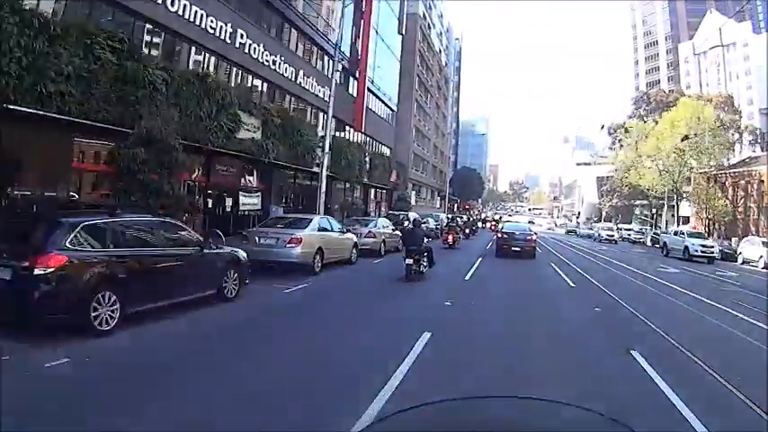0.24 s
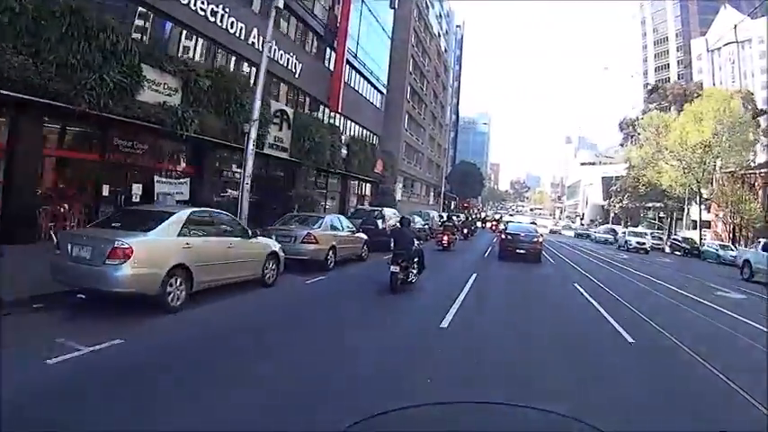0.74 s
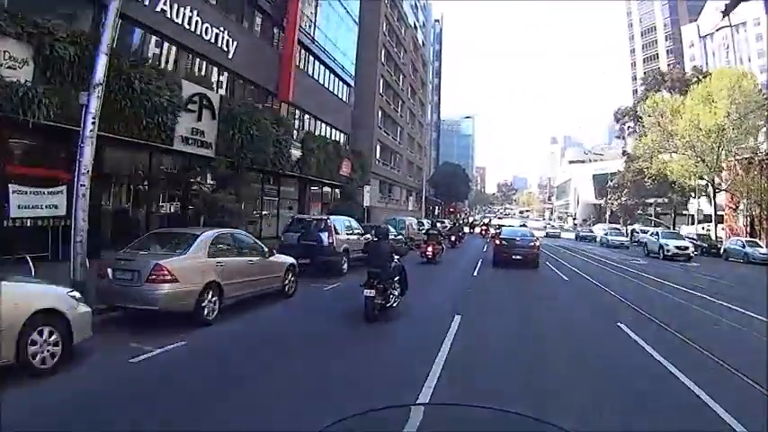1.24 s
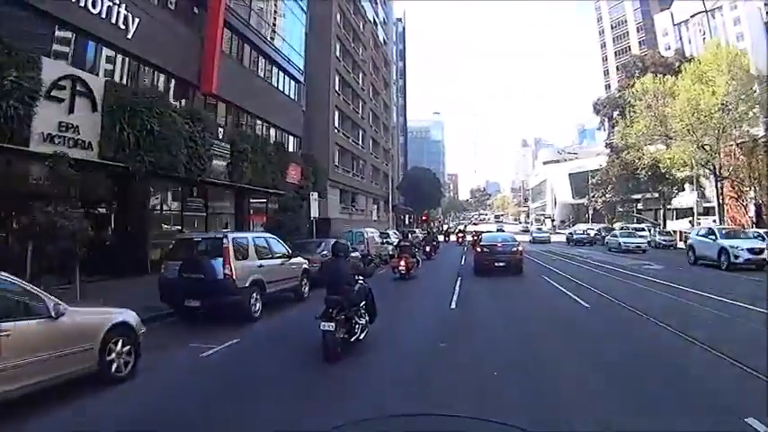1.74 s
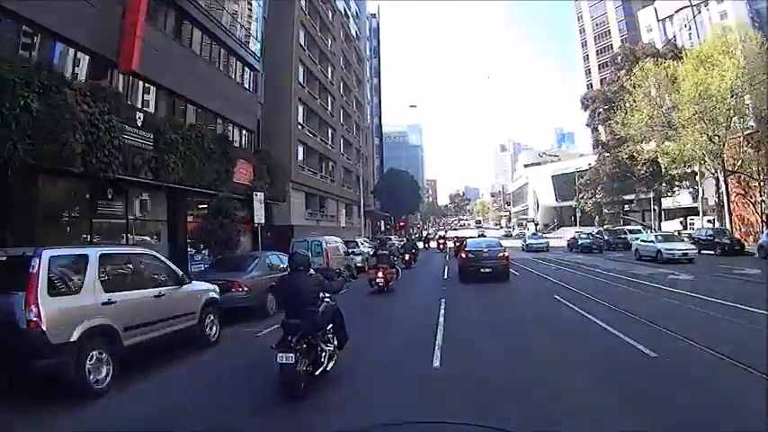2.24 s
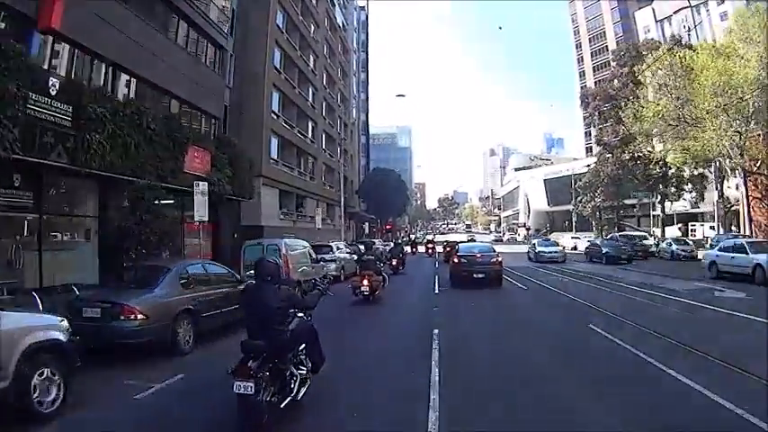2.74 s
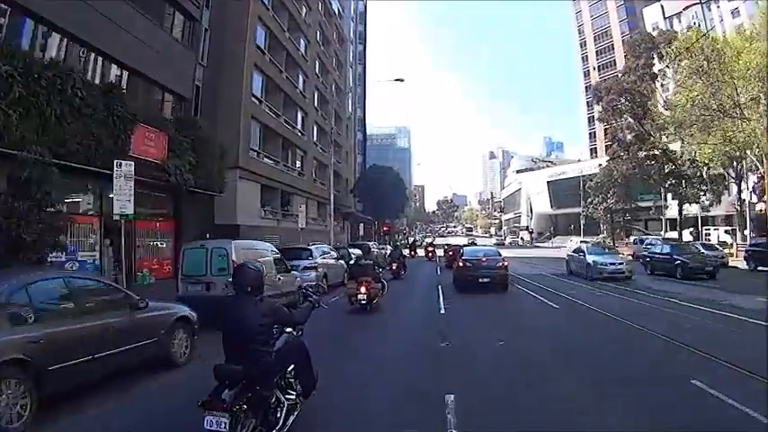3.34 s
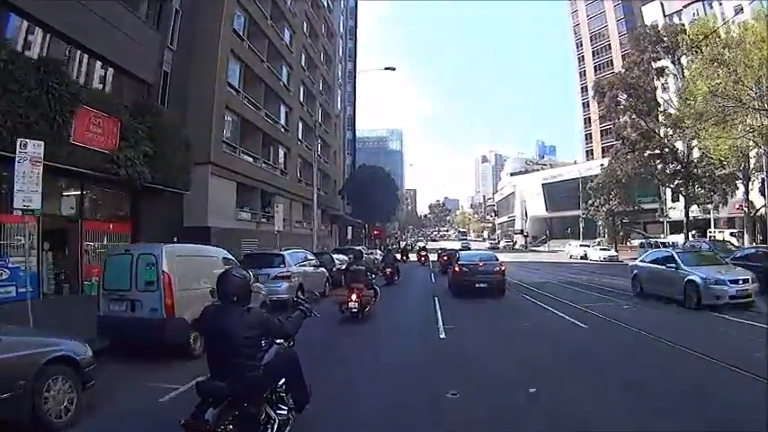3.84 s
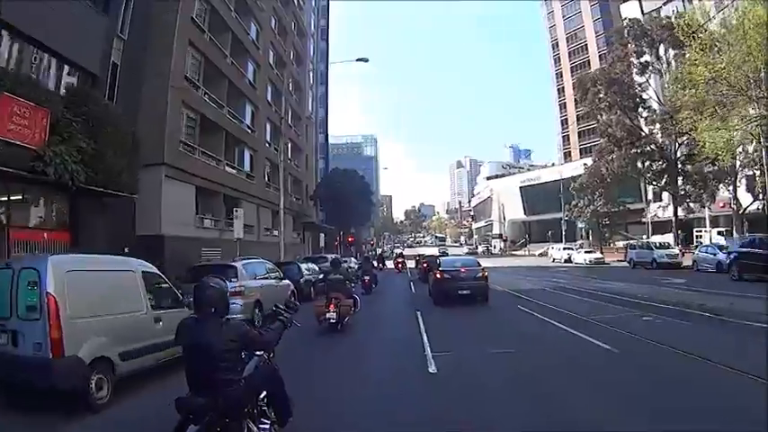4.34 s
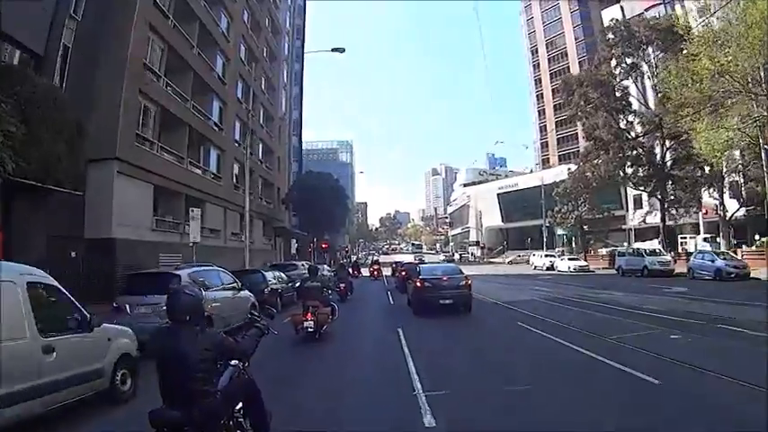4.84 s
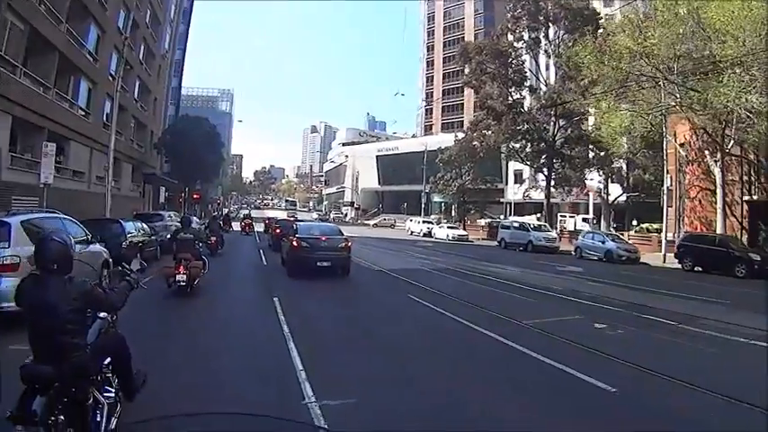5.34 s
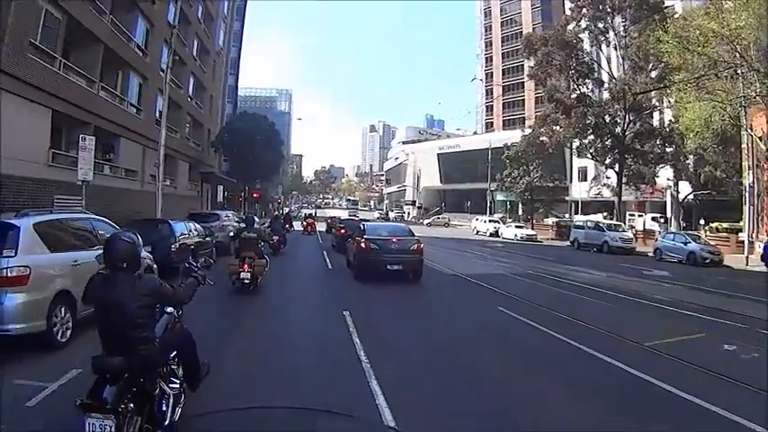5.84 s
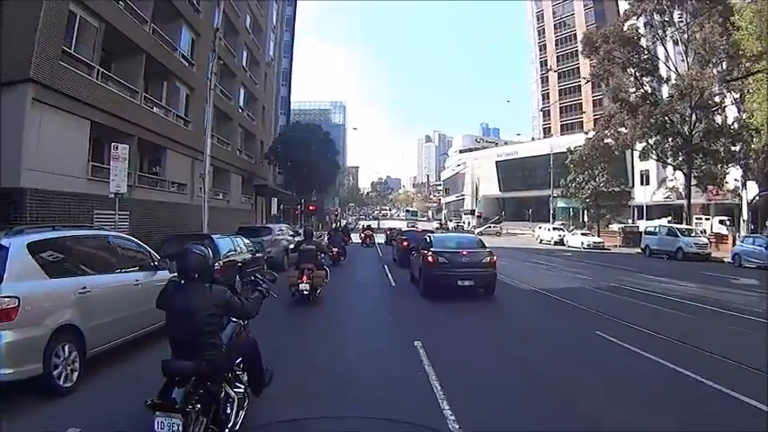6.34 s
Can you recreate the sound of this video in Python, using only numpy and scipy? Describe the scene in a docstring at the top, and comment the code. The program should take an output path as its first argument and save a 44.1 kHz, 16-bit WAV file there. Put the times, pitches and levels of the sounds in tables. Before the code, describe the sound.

Heard from on a motorcycle slowing in a city street between tall buildings. A loud, harsh brake rasp with bright hiss starts at once and fades over two seconds. Then metallic ticks repeat about three times a second, with short thin high squeals between them. Underneath, the bike's own engine throbs low in uneven surges, other cruisers rumble ahead to the left with echo, and tyre noise thins out.

```python
"""A city street between buildings: a motorcycle slows behind other cruisers, heard from a two-port housing on the bike.
Filtered noise makes the traffic; V-twin pulses and puffs, echoed by the fronts, make the throbbing engines.
Decaying low sines thud through the frame where the road has seams.
Close by, the brake pads rasp, hiss and crackle as clumpy noise rings the housing; as their pressure eases,
struck modes and noise snaps tick, mostly a wheel turn apart, and a gated disc tone squeals in short spells."""
import sys
import numpy as np
from scipy import signal
from scipy.fft import rfft, irfft, next_fast_len
from scipy.io import wavfile
from scipy.ndimage import map_coordinates

SR = 44100
rng = np.random.default_rng(int(sys.argv[2]) if len(sys.argv) > 2 else 0)


def to_wav(sig):
    """Store sig (one row per channel, or 1-D mono) as 16-bit WAV at the path in sys.argv[1].

    Samples outside -1..1 are clipped; the rate is SR.
    """
    pcm = np.clip(np.atleast_2d(sig), -1, 1) * 32767
    pcm = np.round(pcm).astype(np.int16)
    wavfile.write(sys.argv[1], SR, pcm.T)  # frames by channels


N = 290178


def clock():
    """The time of each sample in seconds."""
    return np.arange(N) / SR


def amp(db):
    """Decibels to gain."""
    return 10 ** (np.asarray(db) / 20)


def unit(x):
    """Scaled to rms 1."""
    return x / np.sqrt(np.mean(x ** 2) + 1e-20)


def along(points, hz):
    """(Hz, value) points read on a log frequency axis."""
    point_hz, values = np.transpose(points)
    return np.interp(np.log(hz + 1), np.log(point_hz), values)


def curve(rows):
    """(time_s, value) rows drawn out to one value per sample."""
    time_s, values = np.transpose(rows)
    return np.interp(clock(), time_s, values)


def wobble(rate):
    """A smooth random curve, rate knots a second."""
    knots = rng.standard_normal(N // 8)
    return map_coordinates(knots, [clock() * rate], mode="wrap")


def filtered(x, response):
    """x times a complex response of frequency."""
    size = 2 * next_fast_len(N // 2 + SR // 4)
    hz = np.fft.rfftfreq(size, 1 / SR)
    return irfft(rfft(x, size) * response(hz), size)[..., :N]


def ring(x, spectrum):
    """x through a causal, minimum-phase body with this spectrum."""
    def response(hz):
        cepstrum = irfft(np.log(amp(along(spectrum, hz))))
        half = len(cepstrum) // 2
        # folding the cepstrum forward in time makes the body causal
        return np.exp(rfft(2 * cepstrum[:half], 2 * half) - cepstrum[0])
    return filtered(x, response)


def spread(pair, alike):
    """Two unrelated signals become left and right with a given likeness at each frequency."""
    def mid_side_gains(hz):
        turn = np.arccos(np.clip(along(alike, hz), -1, 1)) / 2
        return np.array([np.cos(turn), np.sin(turn)])
    mid, side = filtered(pair, mid_side_gains)
    return np.array([mid + side, mid - side])


# Likeness of left and right for the diffuse street sound: freq_hz, likeness (-1 to 1)
STREET_LIKENESS = [(60, 0.36), (250, 0.87), (340, -0.21), (480, -0.6), (620, -0.16), (770, -0.59),
                   (900, 0.097), (1050, 0.1), (1400, -0.42)]


def street(x, t60, wet_db):
    """Direct sound plus the diffuse answer of the building fronts, a decaying noise tail (t60 in s)."""
    t = np.arange(SR // 2) / SR
    tail = rng.standard_normal((2, len(t))) * amp(-60 * t / t60)
    echo = signal.fftconvolve(x[None], tail, axes=1)[:, :N]
    diffuse = unit(spread(echo, STREET_LIKENESS))
    return unit(unit(x) + amp(wet_db) * diffuse)


def v_twin(crank_hz, pipe, rough, blow):
    """Two unevenly spaced firings every two crank turns, each a pulse and a puff of gas through the pipe."""
    cycles = np.cumsum(crank_hz) / SR / 2 + rng.random()
    whole = np.arange(1, int(cycles[-1]))
    firing = np.concatenate([whole, whole + 315 / 720])  # the second cylinder fires 315 degrees later
    at = np.interp(firing, cycles, np.arange(N)).astype(int)
    strength = 1 + rough * rng.standard_normal(N)[at]
    pulses = np.bincount(at, strength, N)
    puff_decay = np.exp(-np.arange(SR // 20) / SR / 0.0076)
    puffs = signal.fftconvolve(pulses, puff_decay)[:N] * rng.standard_normal(N)
    return unit(ring(unit(pulses) + blow * unit(puffs), pipe))


# Likeness of the brake sound at the two ports: freq_hz, likeness (-1 to 1)
PORT_LIKENESS = [(1400, 0.96), (1850, 1), (2400, 0.49), (5000, 0.94), (6500, 0.25)]
# Level difference between the ports: freq_hz, left_minus_right_db
PORT_TILT = [(1300, 1), (1800, 3), (2700, 1.5), (3250, -0.5), (5000, 0)]
# Phase difference between the ports: freq_hz, left_lead_rad
PORT_LEAD = [(1400, 1.09), (2100, 0.44), (2500, 2), (3200, 1.84), (3500, 4), (4300, 2.5), (5000, 0),
             (5900, 1.5), (7400, 0), (9500, 0.6)]


def ports(pair):
    """Vibration of the housing reaches the two ports at different phases and strengths."""
    half = np.array([[.5], [-.5]])

    def port_response(hz):
        gain = amp(half * along(PORT_TILT, hz))
        return gain * np.exp(1j * half * along(PORT_LEAD, hz))
    return filtered(spread(pair, PORT_LIKENESS), port_response)


# Colour of the tyre rumble: freq_hz, density_db (per Hz, relative)
RUMBLE_COLOUR = [(15, -41), (45, 3), (200, 0.5), (330, -3.5), (470, -1), (640, -1), (780, 0.5), (900, -4.5),
                 (2200, -5.5), (5000, -17), (11000, -66)]
# Colour of the tread hum: freq_hz, density_db (per Hz, relative)
TREAD_COLOUR = [(500, -24.5), (700, -13.5), (780, 6.5), (870, 0), (990, 6), (1220, -2.5), (1700, 0.5),
                (3000, -36.5)]
# Course of the tyre noise, the base for rumble and hum: time_s, level_db
ROAD_LEVEL = [(0.0, -36), (0.4, -41), (1.28, -39), (1.98, -44.5), (3.92, -46.5), (4.45, -45.5), (5.44, -48),
              (6.58, -44.5)]
RUMBLE_DB, TREAD_DB = 11, 1.5  # offsets from the road level
RUMBLE_SWAY_DB, TREAD_SWAY_DB = 1.1, 0.77
ROUGH_DB, ROUGH_S = 0.46, 0.077  # broken asphalt around each seam: lift and half width
ONCOMING_AT_S, ONCOMING_S, ONCOMING_DB = 4.47, 1.33, -36.5  # nearest moment, time to fall 3 dB, hum level


def traffic():
    """Tyres rumble and their treads hum, louder on broken asphalt; the hum swells as oncoming cars pass."""
    def roar(colour):
        noise = rng.standard_normal((2, N))
        return unit(spread(ring(noise, colour), STREET_LIKENESS))
    t = clock()
    rough_patches = sum(np.exp(-((t - s) / ROUGH_S) ** 2) for s, _ in SEAMS)
    road_db = curve(ROAD_LEVEL) + ROUGH_DB * rough_patches
    oncoming = amp(ONCOMING_DB) / np.hypot(1, (t - ONCOMING_AT_S) / ONCOMING_S)
    hum_level = np.hypot(amp(road_db + TREAD_DB), oncoming)
    rumble = roar(RUMBLE_COLOUR) * amp(road_db + RUMBLE_DB + RUMBLE_SWAY_DB * wobble(8))
    hum = roar(TREAD_COLOUR) * hum_level * amp(TREAD_SWAY_DB * wobble(11))
    return rumble + hum


# Colour of the distant exhausts: freq_hz, gain_db
FAR_EXHAUST_COLOUR = [(20, -25), (50, -6), (85, 0.5), (130, -1), (175, 1), (262, -2), (300, -9), (600, -22),
                      (1500, -33.5)]
# Course of the bikes ahead: time_s, level_db
CRUISER_LEVEL = [(0, -27), (.7, -34), (1.4, -33.5), (1.85, -33), (2.9, -37.5), (3.3, -35), (3.95, -39.5),
                 (4.45, -34.5), (5.6, -35.5), (6.15, -37), (6.58, -33)]
LEFT_LEAD_S = 0.00079


def cruisers():
    """A group of V-twins ahead, each wandering about its own crank speed, echoes between the fronts."""
    group = np.zeros(N)
    for centre_hz in (27, 36, 43):  # crank turns a second
        crank_hz = centre_hz * np.exp(.12 * wobble(2.5))
        group += v_twin(crank_hz, FAR_EXHAUST_COLOUR, rough=.45, blow=1.1)
    pair = amp(curve(CRUISER_LEVEL)) * street(group, t60=0.54, wet_db=-3)
    # they ride to the left, so the left side hears them first
    sides = np.array([[1], [-1]])
    return filtered(pair, lambda hz: np.exp(1j * np.pi * hz * LEFT_LEAD_S * sides))


# Engine speed before its random drift: time_s, crank_hz (turns a second)
CRANK_SPEED = [(0, 52), (.6, 43.5), (1.5, 39), (3.2, 41.4), (3.7, 44.7), (5.2, 42.5), (5.6, 39.8),
               (6.05, 44)]
# Brief swells of the throb: time_s, half_width_s, lift_db
THROB_SURGES = [(.11, 0.13, 6), (.52, 0.085, 3), (1.45, 0.14, 7), (3.22, 0.14, 2.5), (3.69, 0.08, 7.5),
                (6.05, 0.12, 5.5), (6.38, .07, 6)]
# Colour of the bike's own exhaust: freq_hz, gain_db
EXHAUST_COLOUR = [(15, -25), (35, -18), (55, -1.5), (82, 5.5), (125, -2), (170, -9.5), (215, -6.5),
                  (265, -12), (330, -23.5), (600, -33), (1500, -55)]
EXHAUST_DB, BOOM_DB = -39.5, -45.5  # base levels, before the surges
CRANK_DRIFT = .025  # wander of the speed, as a share
BOOM_SWAY_DB, THIRD_DB = 3, -4.5  # unevenness of the boom, third order against the second


def own_engine():
    """The V-twin throbs through its pipe; the second and third crank orders boom through the frame."""
    t = clock()
    surge_db = sum(db * np.exp(-((t - s) / width) ** 2) for s, width, db in THROB_SURGES)
    crank_hz = curve(CRANK_SPEED) * (1 + CRANK_DRIFT * wobble(16))
    turn = 2 * np.pi * np.cumsum(crank_hz) / SR
    second = np.sin(2 * turn) * amp(BOOM_SWAY_DB * wobble(24))
    third = np.sin(3 * turn) * amp(THIRD_DB + BOOM_SWAY_DB * wobble(14))
    boom = second + third
    exhaust = street(v_twin(crank_hz, EXHAUST_COLOUR, rough=0.39, blow=1.0), t60=0.1, wet_db=-8)
    return amp(surge_db) * (amp(EXHAUST_DB) * exhaust + amp(BOOM_DB) * boom)


# Seams in the road: time_s, thud_db (relative)
SEAMS = [(0.154, -14), (.842, -20), (1.33, -18), (1.402, -19.5), (3.157, -20), (3.189, -22), (3.226, -17.5),
         (3.253, -20)]


def bumps():
    """Seams in the road rock the frame: a 112 Hz sine swells and dies within a few cycles."""
    age = np.arange(SR // 20) / SR
    swell = age / 0.0036 * np.exp(1 - age / 0.0035)
    rock = np.sin(2 * np.pi * 112 * age) * swell
    thud = np.zeros(N)
    for s, db in SEAMS:
        thud[round(s * SR):][:len(age)] -= amp(db - 1) * rock
    return thud


# How hard the pads press: time_s, pressure_db
PAD_PRESSURE = [(0.0, -26.5), (0.48, -26.5), (1.26, -29), (1.45, -32.5), (2.22, -37), (2.67, -37),
                (2.95, -39.5), (3.28, -37), (3.7, -38.5), (4.14, -37), (4.36, -35.5), (4.65, -35),
                (5.46, -39), (5.97, -38.5), (6.17, -36), (6.58, -37.5)]
# Ring of the housing, heard as the rasp: freq_hz, density_db (per Hz, relative)
HOUSING_COLOUR = [(900, -49.5), (1250, -19.5), (1400, -8.5), (1520, 1.5), (1640, 2), (1760, 0), (1900, -9),
                  (2200, -18.5), (2800, -19), (4000, -58.5)]
# Hiss of the pads: freq_hz, density_db (per Hz, relative)
HISS_COLOUR = [(1800, -12), (2270, -9), (2650, 3), (3080, 8), (3330, 2), (3700, -6.5), (4220, -1),
               (4550, -4), (5150, -6.5), (5900, -11.5), (7000, -53)]
# Gritty crackle of the pads: freq_hz, density_db (per Hz, relative)
GRIT_COLOUR = [(3500, -19.5), (4400, -7), (4900, 9), (5300, 5.5), (5900, 8.5), (6400, 3), (7350, 4.5),
               (8200, -3), (8900, -4.5), (9600, -1), (10400, -19), (11000, -38)]
LIGHT_DB, FULL_BITE_DB = -37, 8.5  # pressure of a light touch; this far above it the rasp stops growing
RASP_DB, RASP_GROWS = -25.5, 0.75  # level at a light touch, dB per dB of pressure; likewise below
HISS_DB, HISS_GROWS = -34, 1.13
GRIT_DB, GRIT_GROWS = -45.5, 0.96
TURN_S, HIGH_SPOT_S, WARP_DB = 0.3345, 4.03, 0.5  # wheel turn, a moment the warp meets the pads, light-touch swell


def rub():
    """Clumps of tiny slips ring the housing, hiss and crackle; pressed harder, pads slide louder and more evenly."""
    press_db = curve(PAD_PRESSURE) - LIGHT_DB
    bite_db = np.minimum(press_db, FULL_BITE_DB)
    looseness = amp(-.45 * np.maximum(press_db, 0))
    warp_db = WARP_DB * looseness * np.cos(2 * np.pi * (clock() - HIGH_SPOT_S) / TURN_S)
    clumps_db = (0.69 * wobble(80) + 0.81 * wobble(450)) * looseness
    flutter = wobble(130)  # shared by hiss and grit: the treble comes in brief spurts
    spurts_db = 1.5 * wobble(45) + 1.4 * flutter + 2.2 * wobble(900)

    def slips(uneven_db, colour):
        noise = rng.standard_normal((2, N)) * amp(uneven_db)
        return unit(ring(noise, colour))
    rasp = amp(RASP_DB + RASP_GROWS * bite_db) * slips(clumps_db, HOUSING_COLOUR)
    hiss = amp(HISS_DB + HISS_GROWS * press_db) * slips(clumps_db + 2.1 * flutter, HISS_COLOUR)
    grit = amp(GRIT_DB + GRIT_GROWS * press_db) * slips(clumps_db + spurts_db, GRIT_COLOUR)
    return amp(warp_db) * (rasp + hiss + grit)


# High spots of the disc catch the pads: time_s, clack_db (relative), snap_db (relative)
PAD_TICKS = [(1.716, -22, -31.5), (2.0349, -14, -32), (2.3624, -12, -31), (2.6897, -16, -31.5),
             (2.802, -18, -33), (2.915, -14, -41), (3.016, -8.5, -36), (3.1247, -13.5, -37),
             (3.3412, -9.5, -30), (3.6708, -9.5, -30), (3.998, -9.5, -29), (4.1993, -12, -29.5),
             (4.2443, -14, -28), (4.2947, -23, -30.5), (4.333, -8, -29), (4.6702, -12, -32),
             (5.0066, -10, -29), (5.3419, -8.5, -30), (5.681, -9, -31), (6.0226, -11, -30),
             (6.058, -13, -34), (6.3672, -7.5, -30), (6.4758, -16, -41)]
# Modes of the struck housing: centre_hz, level_db (relative), t60_s
CLACK_MODES = [(1582, -4, 0.028), (1717, -1.5, 0.021), (2550, -15, .014), (2995, -13, 0.027)]
# Colour of the snap: freq_hz, density_db (per Hz, relative)
SNAP_COLOUR = [(1500, -7), (2700, -2), (3500, -1.5), (4200, -5), (5000, 0.5), (6200, -16.5), (6900, -13),
               (8500, -19.5), (9500, -18.5), (11000, -26.5)]
CARRIER_HZ = 2220  # centre of the pad carrier's ring
CARRIER_DB, CARRIER_FADE_DB_PER_S = -12, 5.5  # its strength at the first tick; it weakens as the wheel slows
SNAP_RISE_S, SNAP_FALL_S, SCRAPE_S, SCRAPE_DB = .0014, .0027, .016, -23  # the snap and the scrape trailing it


def ticks():
    """A pad knocks against its carrier: a brief clack of ringing modes, a gritty noise snap and a scrape after it."""
    clacks, snaps = np.zeros((2, N)), np.zeros((2, N))
    t = np.arange(SR // 25) / SR
    lead = SR // 500  # the snap starts just before the housing swings
    swing_up = (1 - np.exp(-t / 0.0012)) ** 2  # the housing needs a few cycles to swing up
    fall = np.exp(-t / SNAP_FALL_S) + amp(SCRAPE_DB) * np.exp(-t / SCRAPE_S)
    snap_shape = fall * (1 - np.exp(-t / SNAP_RISE_S)) ** 3

    def mode(hz, db, t60):
        detuned_hz = hz * rng.normal(1, 0.013)
        return amp(db - 60 * t / t60) * np.sin(2 * np.pi * detuned_hz * t)
    first_s = PAD_TICKS[0][0]
    for s, clack_db, snap_db in PAD_TICKS:
        start = round(s * SR)
        housing = sum(mode(hz, clack_db + level + 7.5, t60) for hz, level, t60 in CLACK_MODES)
        carrier_db = CARRIER_DB - CARRIER_FADE_DB_PER_S * (s - first_s)
        carrier = mode(CARRIER_HZ, carrier_db, t60=0.025)
        clacks[0, start:][:len(t)] += (housing + carrier) * swing_up
        snap = amp(snap_db + 28.5) * snap_shape * rng.standard_normal((2, len(t)))
        snaps[:, start - lead:][:, :len(t)] += snap
    return clacks + ring(snaps, SNAP_COLOUR)


# Spells of squeal: start_s, end_s, level_db (relative)
SQUEAL_SPELLS = [(2.483, 2.603, -18.5), (2.742, 2.818, -23), (3.156, 3.34, -32.5), (3.444, 3.543, -23.5),
                 (3.68, 3.917, -37), (4.127, 4.255, -29.5), (4.357, 4.457, -29.5), (4.633, 4.7, -24),
                 (4.826, 4.998, -30.5), (5.51, 5.681, -29), (6.148, 6.26, -31)]
SQUEAL_HZ, SAG_HZ_PER_S = 1559, 5  # the disc's mode at the start, and how fast it sinks
LOCK_S = 0.013  # a squeal takes this long to build or die
FAINT_DB = -36.5  # the mode sings on faintly between spells


def squeal():
    """In spells the slips lock onto one mode of the disc, which sinks as the wheel slows."""
    t = clock()
    grip = np.full(N, amp(FAINT_DB))
    for start, end, db in SQUEAL_SPELLS:
        grip += amp(db) * np.clip(np.minimum(t - start, end - t) / LOCK_S + .5, 0, 1)
    hz = (SQUEAL_HZ - SAG_HZ_PER_S * t) * (1 + 0.00381 * wobble(90))
    phase = 2 * np.pi * np.cumsum(hz) / SR
    wave = np.sin(phase) + amp(-20.0) * np.sin(2 * phase)
    tone = np.sqrt(2) * grip * amp(0.55 * wobble(160)) * wave
    return np.array([tone, np.zeros(N)])


def scene():
    """Street and engines around the brake close by."""
    surroundings = traffic() + cruisers() + own_engine() + bumps()
    brake = rub() + ticks() + squeal()
    return surroundings + ports(brake)


LOW_CUT_HZ, TOP_HZ = 16, 11050


def record(dry):
    """A gentle low cut thins the deepest rumble, and nothing passes above the band limit."""
    return filtered(dry, lambda hz: hz / np.hypot(hz, LOW_CUT_HZ) * (hz < TOP_HZ))


dry = scene()
out = record(dry)
to_wav(out)
```